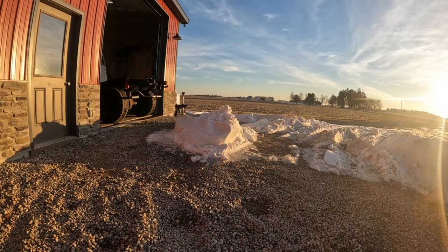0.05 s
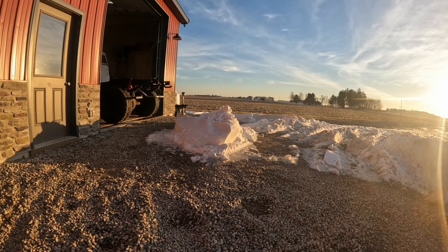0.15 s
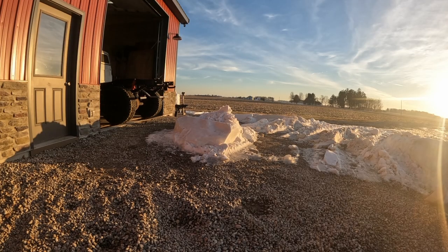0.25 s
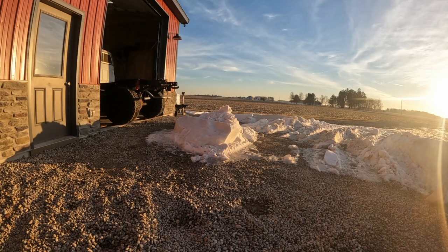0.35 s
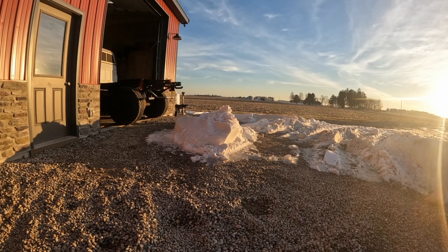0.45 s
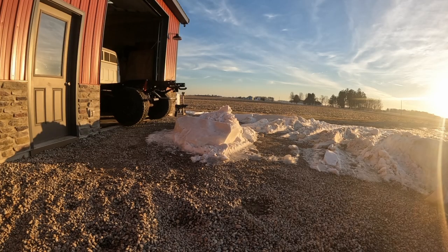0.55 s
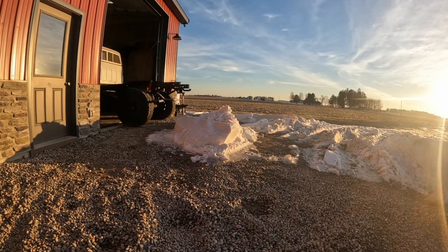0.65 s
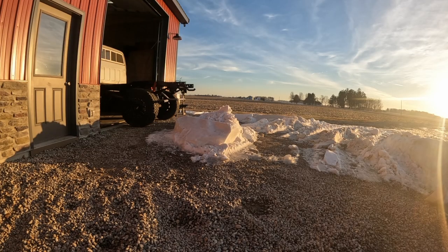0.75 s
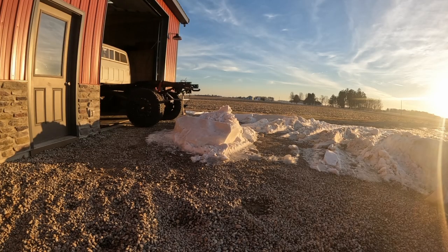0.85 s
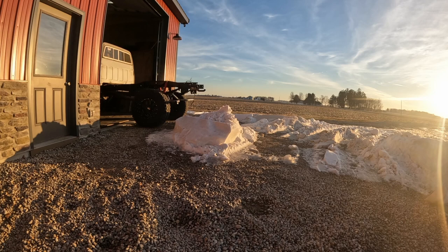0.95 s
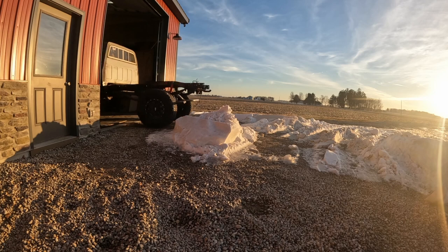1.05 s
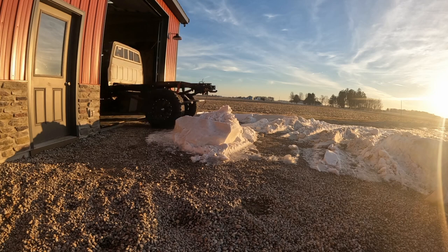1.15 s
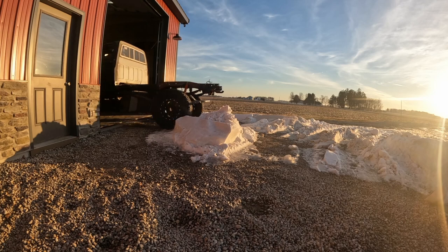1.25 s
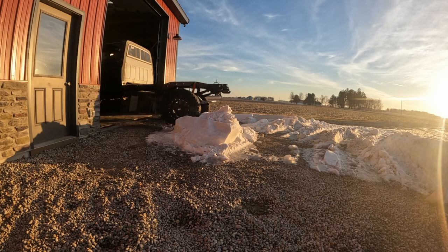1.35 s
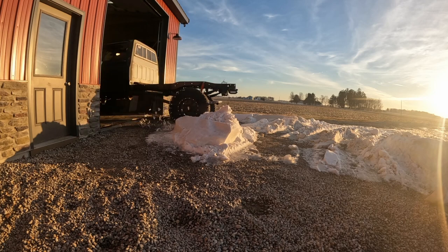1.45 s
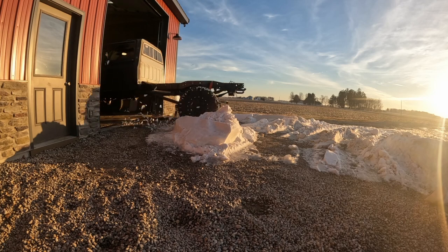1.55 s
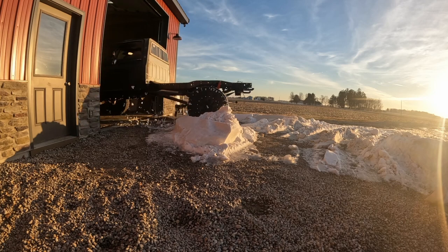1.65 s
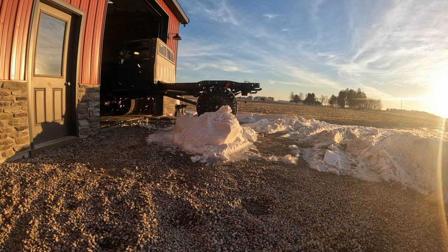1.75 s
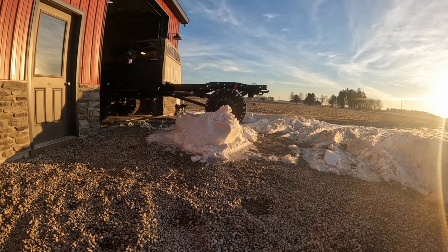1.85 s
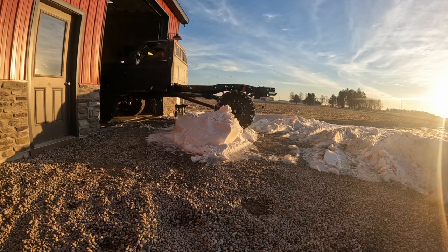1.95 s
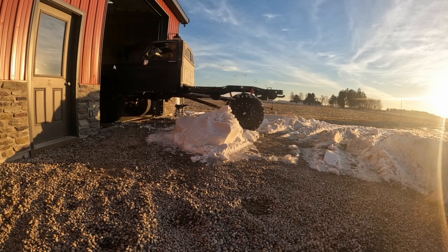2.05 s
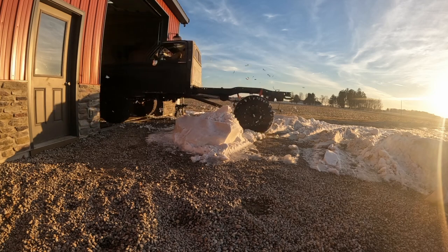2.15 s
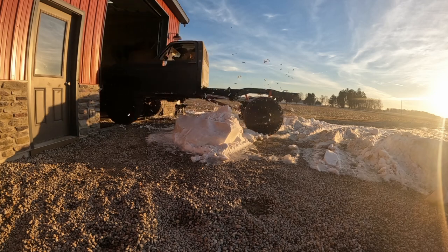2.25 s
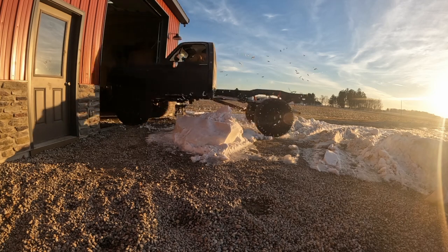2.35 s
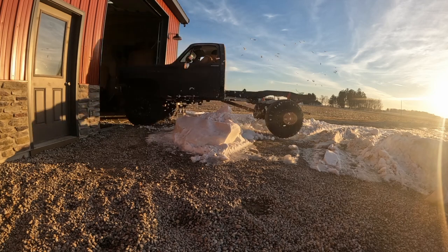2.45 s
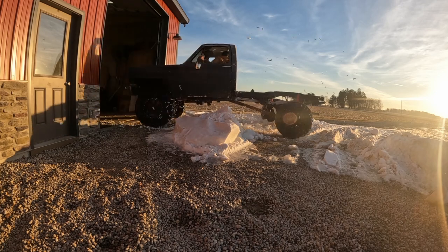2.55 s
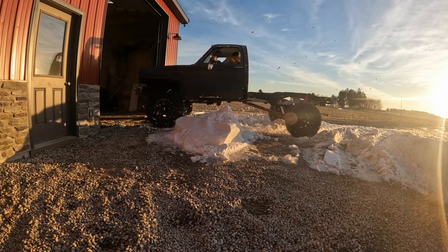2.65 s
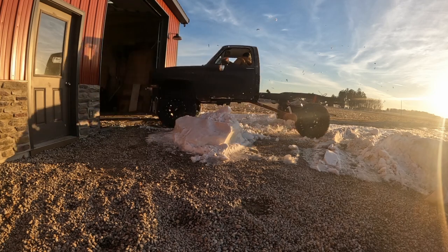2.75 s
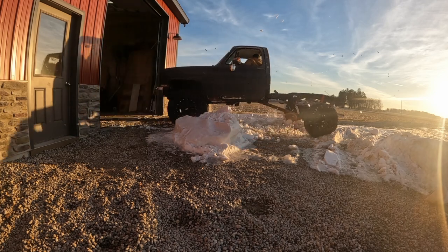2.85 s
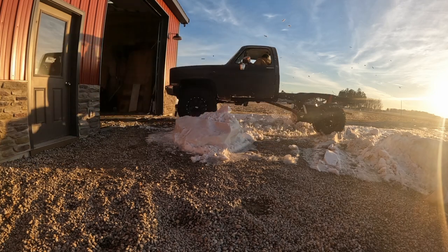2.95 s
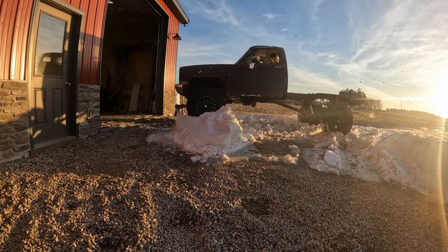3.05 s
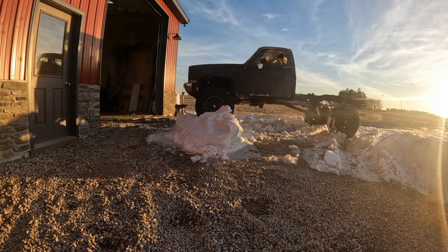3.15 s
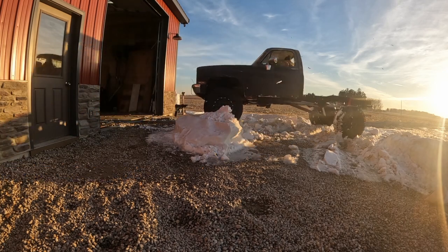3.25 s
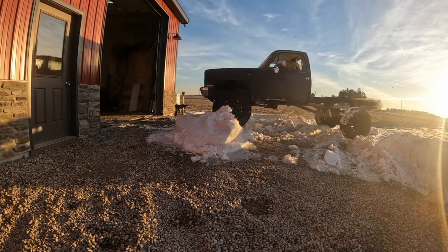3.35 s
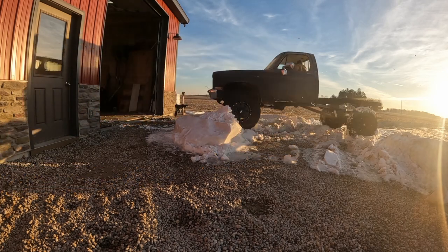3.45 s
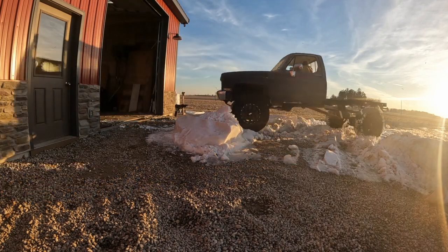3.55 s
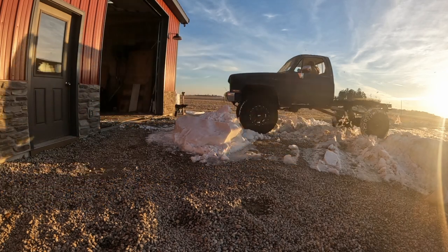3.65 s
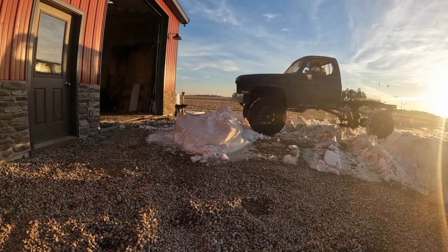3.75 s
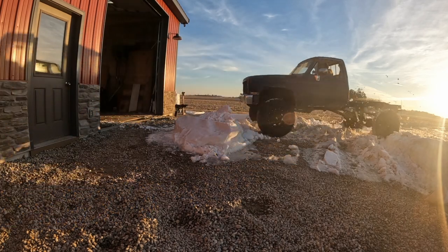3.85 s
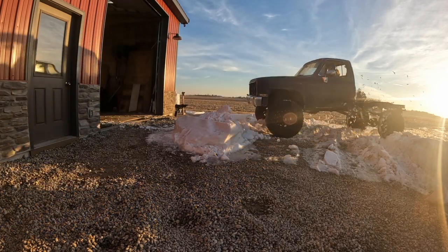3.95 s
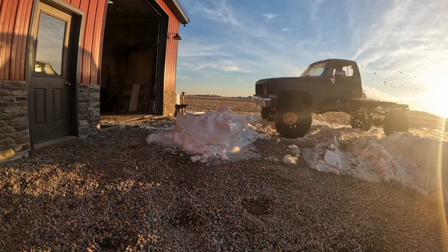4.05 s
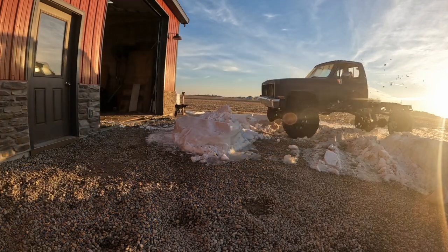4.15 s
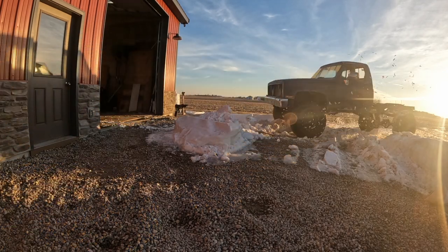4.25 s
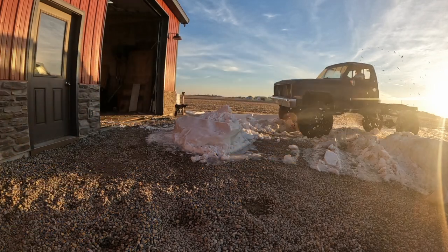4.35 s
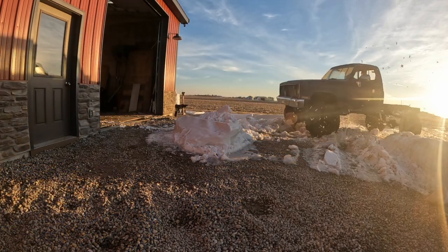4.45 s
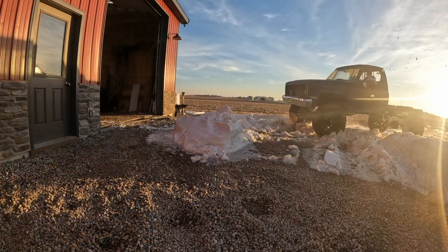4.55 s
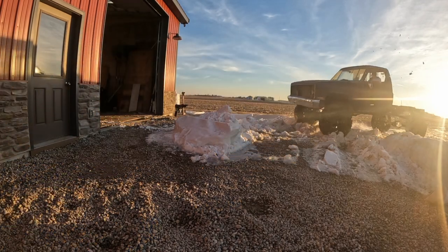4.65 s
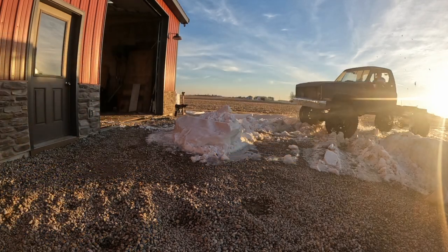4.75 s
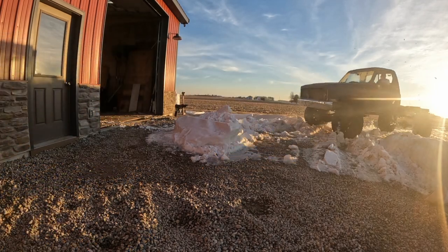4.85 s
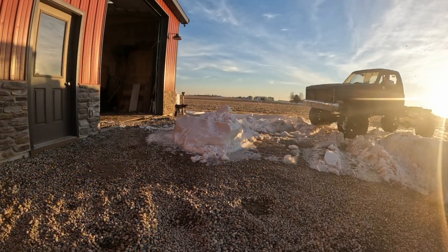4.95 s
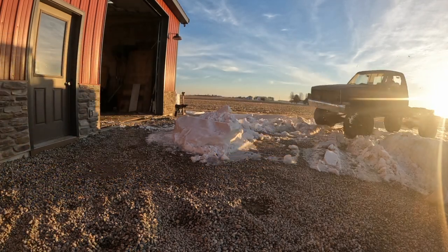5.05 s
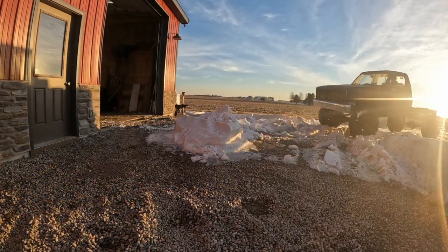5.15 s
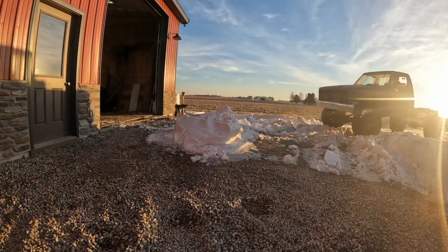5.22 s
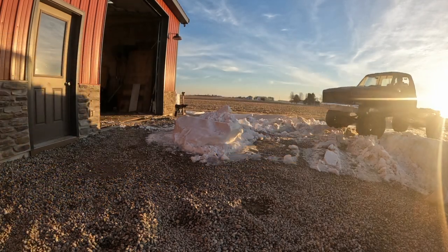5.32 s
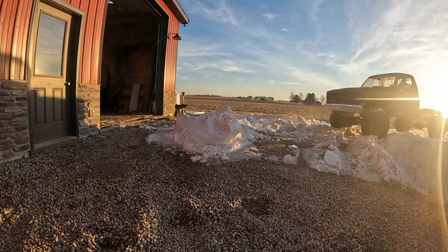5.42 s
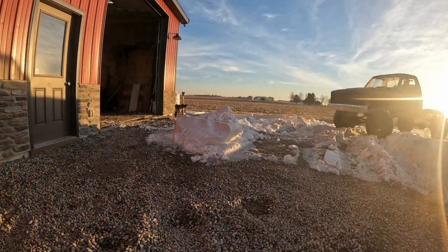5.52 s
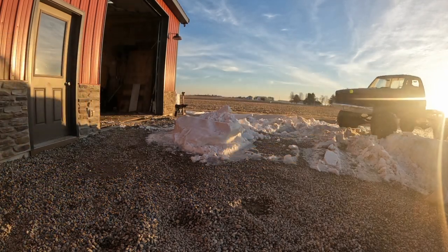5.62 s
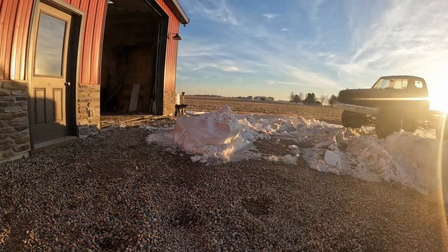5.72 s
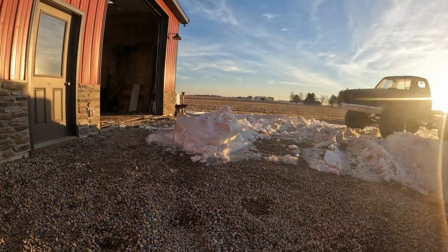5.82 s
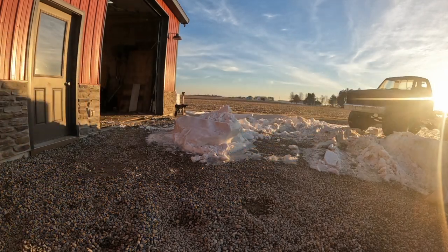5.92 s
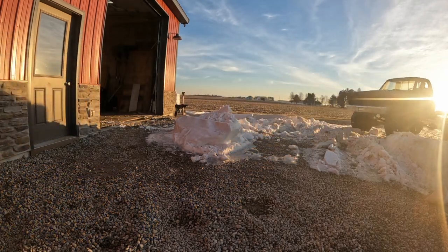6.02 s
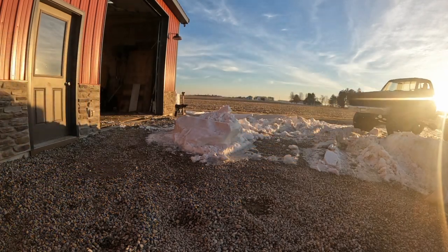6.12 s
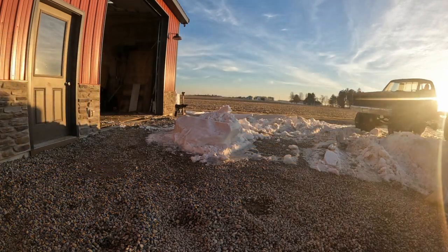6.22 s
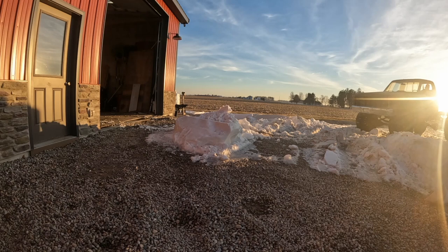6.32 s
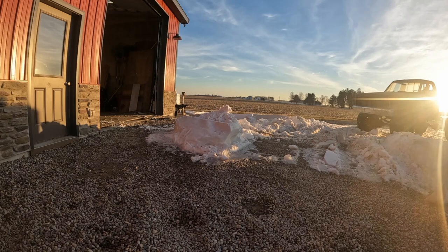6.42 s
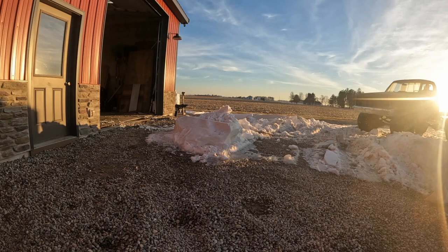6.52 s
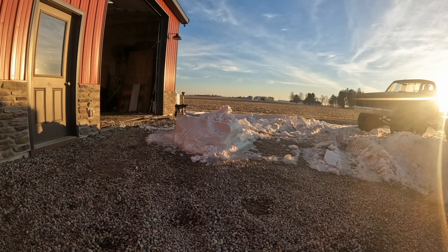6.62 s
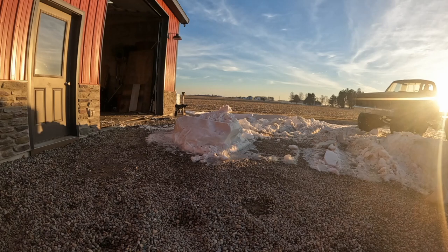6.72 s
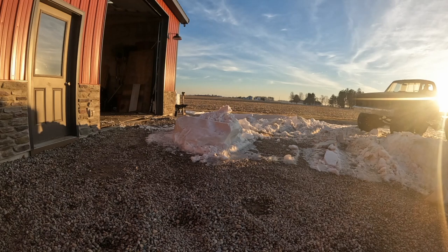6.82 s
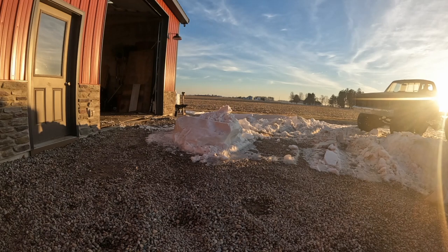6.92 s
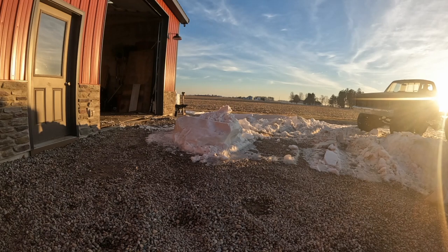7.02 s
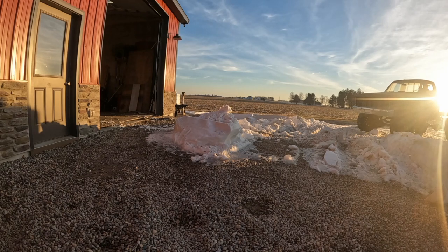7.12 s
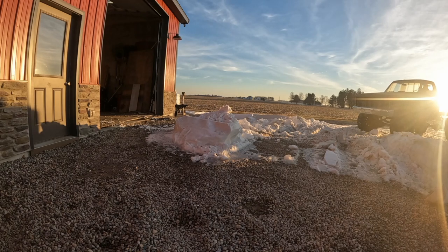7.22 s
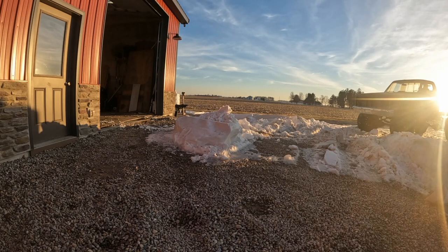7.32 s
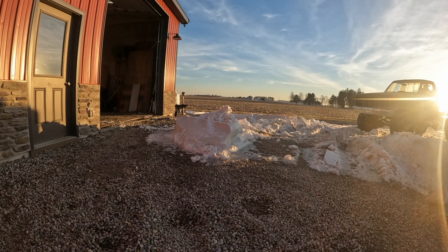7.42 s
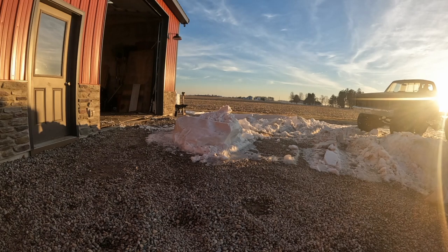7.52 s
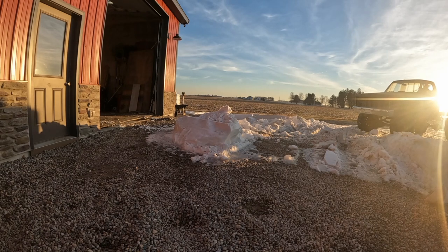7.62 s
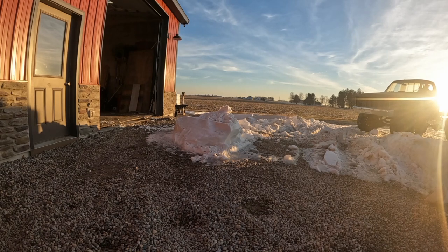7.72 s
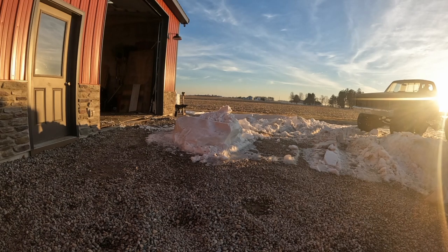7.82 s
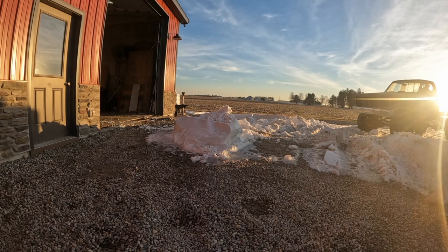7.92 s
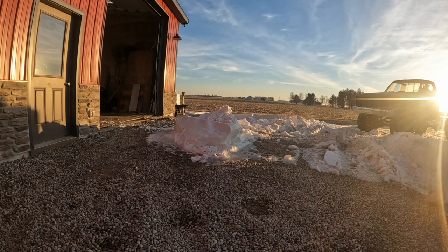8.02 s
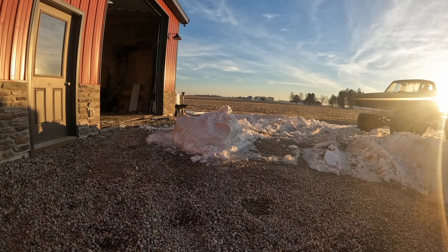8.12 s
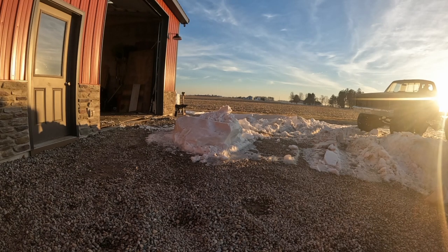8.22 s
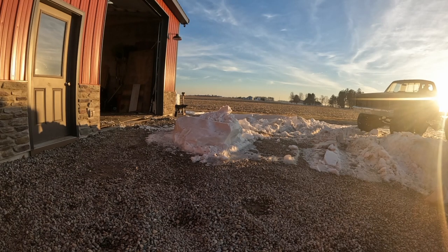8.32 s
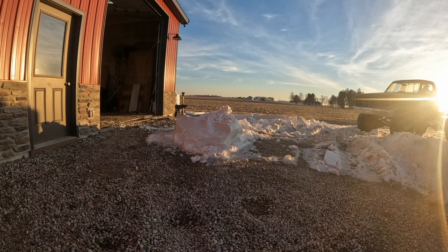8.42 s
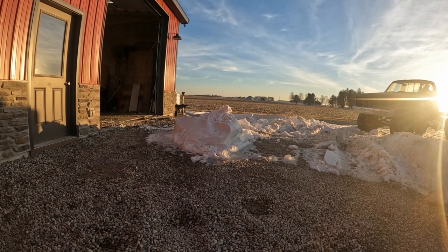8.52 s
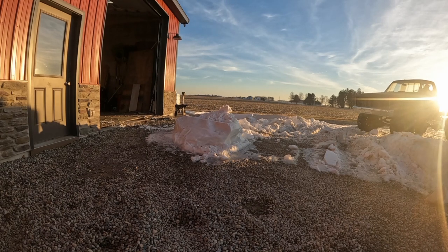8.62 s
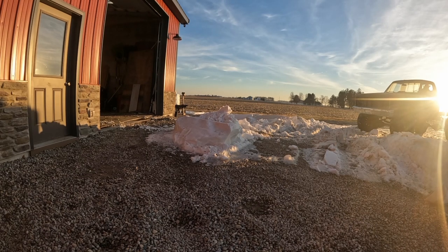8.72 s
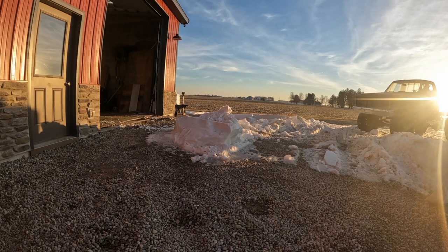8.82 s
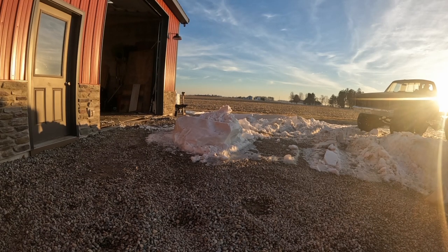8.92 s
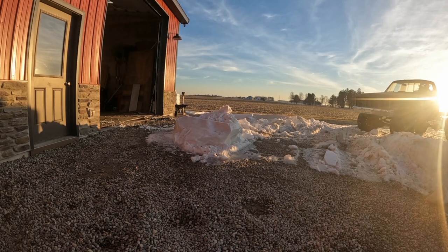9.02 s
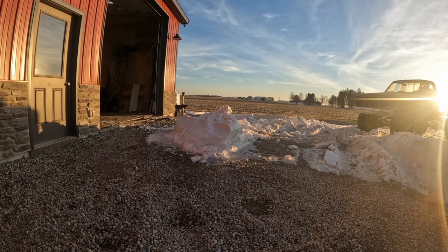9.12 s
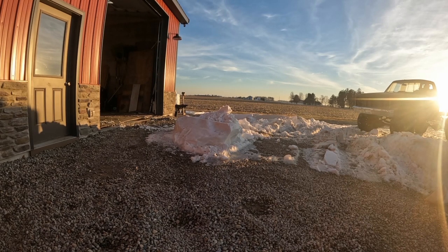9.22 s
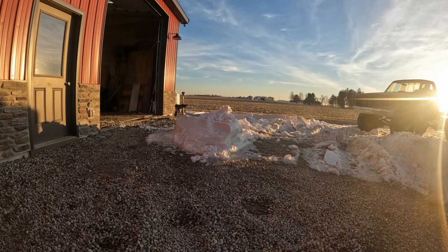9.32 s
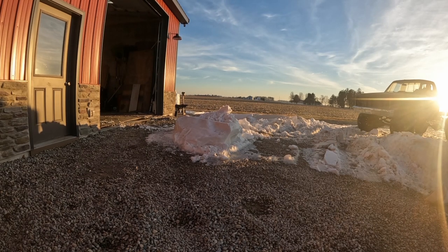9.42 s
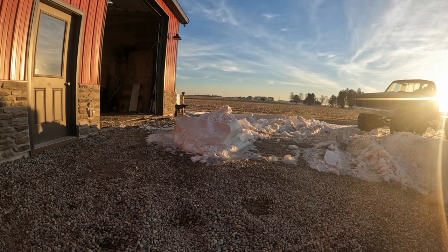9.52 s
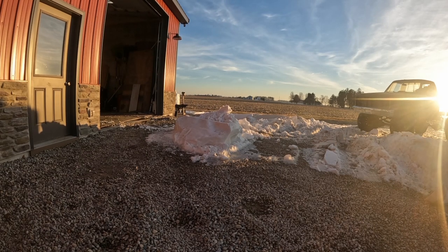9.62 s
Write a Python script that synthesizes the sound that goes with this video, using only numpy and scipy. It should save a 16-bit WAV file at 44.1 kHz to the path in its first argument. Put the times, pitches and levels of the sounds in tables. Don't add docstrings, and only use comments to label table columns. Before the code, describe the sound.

A small fixed stereo camera in an open yard hears a heavy truck with open pipes leave a shed. At 0 s high revs collapse into ragged popping, swelling with a blare through the doorway near 0.8 s. Revs climb from 1 to 1.5 s with dry snaps, dip around 1.8 s, then surge to the hardest roar at 2.6 s, snapping sharply over crunching snow. The throttle shuts at 2.8 s; panels hum and revs collapse near 3 s. A third burst climbs from 3.3 s, sings around 4 s and sags by 5 s. A small stumbling blip comes near 5.6 s, then faint crunches and a tiny brake squeak at 6.3 s. Until about 9.7 s it idles lumpily: one strong crack leads each cycle, some weak or missed, over deep boom, frame drumming and breathy hiss, quickening slightly at the end. Short echoes scatter off wall and snow.

```python
import sys
import numpy as np
from scipy import signal
from scipy.fft import rfft, irfft, next_fast_len
from scipy.io import wavfile
from scipy.ndimage import uniform_filter1d

SR = 44100
rng = np.random.default_rng(int(sys.argv[2]) if len(sys.argv) > 2 else 0)


def generate_wav(sig):
    pcm = np.round(np.clip(np.atleast_2d(sig).T, -1, 1) * 32767).astype(np.int16)
    wavfile.write(sys.argv[1], SR, pcm)


def rack_gain(trim_db):
    fader = np.asarray(trim_db, float)
    return 10 ** (fader / 20)


N = 426444
T = np.arange(N) / SR
HZ = np.fft.rfftfreq(next_fast_len(N), 1 / SR)


def unit(x):
    return x / np.sqrt(np.mean(x ** 2))


def through(x, response):
    size = next_fast_len(N)
    return irfft(rfft(x, size) * response, size)[..., :N]


def read(table):
    hz, value = np.transpose(table)
    return np.interp(np.log(HZ + 1), np.log(hz + 1), value)


def modes(table):
    return sum(gain * 1j * HZ * w / (hz ** 2 - HZ ** 2 + 1j * HZ * w) for hz, w, gain in table)


def moving_mode(x, hz, width_hz):
    turn = np.exp(2j * np.pi * np.cumsum(hz) / SR)
    keep = np.exp(-np.pi * width_hz / SR)
    return np.real(turn * signal.lfilter([1 - keep], [1, -keep], x / turn))


def spikes(times, gains):
    out = np.zeros(N)
    keep = (times >= 0) & (times < T[-1])
    np.add.at(out, (times[keep] * SR).astype(int), gains[keep])
    return out


def fade(x, decay_s, rise_s):
    fall, rise = np.exp(-1 / (np.array([decay_s, rise_s]) * SR))
    falling = signal.lfilter([1], [1, -fall], x)
    return signal.lfilter([1 - rise], [1, -rise], falling)


def walk(rate):
    k = int(SR / rate)
    held = np.repeat(rng.standard_normal(N // k + 1), k)
    return 1.2 * uniform_filter1d(held, size=k)[:N]


def stretch(s, half_s):
    return np.exp(-((T - s) / half_s) ** 4)


def doorway():
    return np.exp(-((T - 0.78) / 0.28) ** 2)


def pulling(rate):
    idle_hz, pull_hz = 5.77, 14.95
    return np.clip((rate - idle_hz) / (pull_hz - idle_hz), 0, 1)


def blend(idle_db, pull_db, pull):
    return idle_db + pull * (pull_db - idle_db)


def truck():
    start, lead_db = cycles()
    rate = np.interp(T, start, 1 / np.gradient(start))
    pull = pulling(rate)
    boom_db, bark_db, rasp_db, hiss_db, drum_db, blare_db = levels(start, lead_db, pull)
    thumps, cracks = firings(start, lead_db, rasp_db)
    thumps = unit(thumps)
    shake = rng.standard_normal(N)
    shaded = (T > 1.29) & (T < 2.33)
    blown = cracks * ~shaded + np.roll(cracks * shaded, int(.009 * SR))
    low_ring, high_rings = mouth_rings(cracks, blown, pull)
    turned = np.interp(T, start, np.arange(len(start)))
    drum_db = np.interp(T - 0.095, T, drum_db)
    out = rack_gain(boom_db) * boom(thumps, shake, rate, pull)
    out += rack_gain(bark_db) * bark(thumps, shake, pull, blare_db)
    out += rack_gain(rasp_db) * (rasp(cracks, pull) + low_ring + punch(cracks, pull))
    out += rack_gain(hiss_db) * (hiss(blown, pull) + high_rings)
    out += rack_gain(drum_db) * drum(start, rate, turned, thumps, shake)
    return out + rocking(turned, pull) + panels() + tyres(rasp_db)


# t/s, engine cycles per s
SPEED = [(0.0, 19.547), (0.158, 9.62), (0.751, 7.699), (0.964, 12.436), (1.427, 15.278), (1.766, 10.631),
         (2.668, 17.028), (3.013, 3.913), (3.097, 7.552), (3.965, 14.942), (4.431, 13.957), (5.042, 4.285),
         (5.666, 10.134), (6.034, 4.92), (6.954, 5.458), (7.617, 4.449), (7.662, 5.652), (9.67, 6.992)]
# t/s of the leading crack, level/dB
UNEVEN = [(0.198, -9.5), (0.3071, 4.5), (0.4377, -0.5), (0.533, 4.5), (1.6201, 0), (1.702, -0.5),
          (2.05, -2.5), (2.6612, 3.5), (2.883, 0), (3.1923, -1.5), (3.3017, 1), (3.5012, -9), (4.167, -4.5),
          (4.5992, -1.5), (4.7053, -4), (4.835, -13.5), (4.9747, -3), (5.1636, -0.5), (5.6818, 1),
          (5.928, -9), (6.315, 2.5), (6.5113, -14.5), (6.7004, 1), (7.072, -1.5), (7.2674, -14.5),
          (7.4743, 3), (7.6831, -3.5), (8.2008, 0), (7.8511, 0.5), (8.685, -1), (1.797, -0.5), (1.887, -1),
          (1.972, 2), (2.131, 0.5), (2.203, 3), (2.272, 2.5), (2.340, 3.5), (2.406, 2), (2.472, 2),
          (2.535, 2.5), (2.597, 2.5), (3.674, 2.5), (3.752, 2), (3.824, 1), (3.895, 1.5), (3.963, 1),
          (4.029, 0), (4.099, 1), (1.129, -0.5), (8.031, 0.5), (8.359, -0.5), (8.522, -0.5), (8.846, -0.5),
          (8.997, 0.5), (9.144, 0.5), (9.293, 0), (9.441, -0.5), (9.588, -2), (4.452, -1.5), (3.593, 2.5),
          (0.973, 1), (1.053, 2), (1.201, -1), (1.271, 0.5), (1.340, 2), (1.407, 1.5), (1.477, 2.5),
         (1.544, -0.5), (3.06, -0.5), (2.724, -7.5), (2.795, -6), (6.119, -2)]


def cycles():
    first_cycle = .7117
    turned = np.cumsum(np.interp(T, *np.transpose(SPEED))) / SR - first_cycle
    start = np.interp(np.arange(int(turned[-1]) + 1), turned, T)
    s, kick_db = np.transpose(UNEVEN)
    nearest = np.argmin(abs(start - s[:, None]), axis=1)
    lead_db = np.zeros(len(start))
    start[nearest] = s
    lead_db[nearest] = kick_db
    return start, lead_db


# t/s, burn level/dB against full, throttle [0-1]
DRIVE = [(0, 1.5, 0), (0.119, -3, 0.53), (0.261, -8, 0.3), (0.312, -3.5, 0.29), (1.098, -0.5, 0.83),
         (1.651, -4.5, 1), (2.552, -5, 1), (2.779, -8.5, 1), (3.161, -9.5, 0.69), (3.291, -2, 0.63),
         (4.501, -3.5, 0.97), (4.781, -7.5, 0.75), (5.267, -5.5, 0.12), (5.4, -0.5, 0.41),
         (5.719, -4.5, 0.95), (5.998, -7, 0.36), (6.4, -3.5, 0.3), (9.67, -3.5, 0.4)]
AWAY_DB_S = (0.089, 0.42, -0.21, 0.32, -0.19, -0.96)
# idling level/dB, pulling level/dB, share of that cycle's kick dB
LEAK = [
    (-4, 1, 0),
    (-0.5, -3.7, 1.3),
    (1.5, -0.5, 0.96),
    (2, 1.5, 0.5),
    (-12, 3, 1.9),
    (9.5, 2, -0.3),
]


def levels(start, lead_db, pull):
    laws = [(-14.5, 1.67, 4, -3.5), (-31.5, 1.84, 14.5, 0.2), (-30.5, 2.03, 12, -0.07),
            (-33.5, 2.05, 0.5, 1.5), (-28.5, 1.17, 9, 3), (-1.5, -0.91, 1, -2.1)]
    leak_share, leak_fade = 0.26, 0.22
    parks_s = 6.5
    s, burn_db, throttle = np.transpose(DRIVE)
    burn_db, throttle = np.interp(T, s, burn_db), np.interp(T, s, throttle)
    turned = np.interp(T, start, np.arange(len(start)))
    blow = uniform_filter1d(np.clip((leak_share - turned % 1) / leak_fade, 0, 1), size=88)
    kicked = uniform_filter1d(blow * lead_db[turned.astype(int)], size=200)
    out = []
    for law, away, (idle_db, pull_db, kick) in zip(laws, AWAY_DB_S, LEAK):
        base_db, share, open_db, fast_db = law
        level = base_db + share * burn_db + open_db * throttle + fast_db * pull
        level = level + away * np.minimum(T, parks_s)
        leak = blend(idle_db, pull_db, pull) * (blow - leak_share)
        out.append(level + leak + kick * kicked)
    out[-1] = out[-1] + 10.5 * doorway()
    return out


# share of the cycle, pulling level/dB, idling level/dB, coasting level/dB
CYLINDERS = [(0, 0, 0, 0), (.125, -20, -3, -14), (.205, -2, -12, -16), (.32, -14, -22, -18),
             (.38, -10, -24, 1), (.47, -22, -25, -14), (.565, -6, -24, -13), (.72, -20, -22, -20),
             (.785, -10, -10, -15), (.92, -20, -24, -13)]
# share of the cycle pulling, level/dB, share idling, level/dB
THUMPS = [(-0.027, -1.5, -0.025, 0.0), (0.121, -6.1, 0.091, -5.9), (0.226, -5.0, 0.218, -5.2),
          (0.282, -4.5, 0.295, -10.2), (0.338, -4.4, 0.336, -3.8), (0.398, -5.2, 0.534, -7.8),
          (0.553, -14.0, 0.596, -4.8), (0.773, -1.6, 0.731, -3.0), (0.818, 0.0, 0.779, -6.6),
          (0.918, -4.6, 0.871, -1.8)]
# t/s, peak level/dB
POPS = [(0.3429, -8.5), (0.4635, -10.5), (0.5505, -17), (0.623, -12.5), (0.693, -2.5), (0.7604, -16.5),
        (0.8236, -9.5), (0.9195, -6), (4.249, -11), (4.395, -10.5), (8.707, -29.5), (1.737, -15),
        (1.829, -18), (1.919, -15.5), (0.645, -11.5), (0.814, -10), (0.518, -21.5), (2.355, -15.5),
        (1.991, -5.5), (3.515, -8), (5.441, -13.5), (6.5412, -22), (7.295, -26), (0.078, -2.5),
        (2.07, -6.5), (3.2657, -9.5), (3.422, -2.5), (3.436, -16), (5.552, -9.5), (5.647, -9), (5.912, -28),
        (4.917, -26), (5.096, -25), (5.293, -21.5)]


def firings(start, lead_db, rasp_db):
    jitter, thump_scatter_db, crack_scatter_db = .002, 1.2, 2.0
    pop_s, pop_db = np.transpose(POPS)
    crack_over_rasp_db = 25.5
    pop = rack_gain(6.5 + pop_db - np.interp(pop_s, T, rasp_db + crack_over_rasp_db))
    pop *= np.sqrt(np.interp(pop_s, start, np.gradient(start)))

    start = np.r_[2 * start[0] - start[1], start][:, None]
    length = np.diff(start, append=2 * start[-1:] - start[-2:-1], axis=0)
    pull = pulling(1 / length)
    share, crack_pull, crack_idle, crack_coast = np.transpose(CYLINDERS)
    share_pull, thump_pull, share_idle, thump_idle = np.transpose(THUMPS)
    chance = rng.standard_normal((3, len(start), len(share)))
    follows = share > 0

    thump_s = start + length * (blend(share_idle, share_pull, pull) + jitter * chance[0])
    thump_db = blend(thump_idle, thump_pull, pull) + thump_scatter_db * chance[1]
    crack_s = start + length * (share + jitter * chance[0] * follows)
    coasting = (start > 1.6) & (start < 1.95)
    crack_db = np.where(coasting, crack_coast, blend(crack_idle, crack_pull, pull))
    crack_db = crack_db + crack_scatter_db * chance[2] * follows
    crack_db[1:, 0] += lead_db
    crack_db[1:, 1] += lead_db
    thump_db[1:, :3] += 0.17 * lead_db[:, None]
    even = np.sqrt(length)
    cracks = spikes(crack_s, rack_gain(crack_db) * even) + spikes(pop_s, pop)
    return spikes(thump_s, rack_gain(thump_db) * even), cracks


# idling f/Hz, multiple of the cycle rate pulling, width/Hz, gain
BOOM = [(59.1, 5.1, 11.7, 0.67), (84, 6.2, 41.5, -0.25), (99.5, 7.6, 13.1, 0.4), (19.5, 1.1, 11, -0.035)]


def boom(thumps, shake, rate, pull):
    push = thumps + rack_gain(-26 + 6 * pull) * shake
    out = 0
    for hz, multiple, width, gain in BOOM:
        out = out + gain * moving_mode(push, np.maximum(hz, multiple * rate), width)
    return unit(through(out, modes([(57.4, 146, 1)]) / (1 + 1j * HZ / 260) ** 2))


# f/Hz, width/Hz, signed gain
BARK = [(140.5, 21.2, -0.2), (216, 20.5, 0.21)]
# f/Hz, width/Hz, signed gain
BLARE = [(261, 76, -0.053), (350, 173, 0.031), (631, 96, -0.024)]


def bark(thumps, shake, pull, blare_db):
    push = thumps + rack_gain(-13) * shake
    short = unit(through(push, modes(BARK) * modes([(160.0, 113, 1)]) ** 2))
    blare = unit(through(push, modes(BLARE) * modes([(337, 1400, 1)])))
    return short + rack_gain(-13.0 + 7.9 * pull + blare_db) * blare


def punch(cracks, pull):
    late = np.exp(-2j * np.pi * HZ * 0.00276)
    loaded = np.maximum(pull, 0.89 * doorway())
    return loaded * rack_gain(1.5) * unit(through(cracks, late * modes([(140, 206, 1)]) ** 2))


def gas(cracks, colour, eddies_hz, decay_s, tail_s, tail_db, steady_db, top_db=0, scatter_db=2.0,
        rise_s=.0013):
    out = 0
    for low_hz, high_hz in zip(eddies_hz, eddies_hz[1:]):
        hits = cracks * rack_gain(scatter_db * rng.standard_normal(N))
        spit = unit(fade(hits, decay_s, rise_s))
        breath = unit(fade(hits, tail_s, rise_s=.005)) * rack_gain(3 * walk(160))
        flow = spit + rack_gain(tail_db) * breath + rack_gain(steady_db + 3 * (low_hz > 7000))
        inside = (HZ >= low_hz) & (HZ < high_hz)
        band = through(unit(flow) * rng.standard_normal(N), rack_gain(read(colour)) * inside)
        out = out + band * rack_gain(top_db * (low_hz > 5000))
    return unit(out)


# f/Hz, level/dB per Hz
RASP = [(420, -29.5), (720, -8), (837, -12), (915, -1.5), (1080, 2.5), (1260, -9), (1650, -10), (1980, -10),
        (2500, -30.5), (3250, -49.5), (5500, -120)]


def rasp(cracks, pull):
    return gas(cracks, RASP, (0, 800, 1500, SR), decay_s=.0026, tail_s=.022, tail_db=-5,
               steady_db=-2.5 - 7 * pull)


# f/Hz, level/dB per Hz
HISS = [(1400, -18), (2400, -17.5), (2630, -9), (2870, 0.5), (3080, 2), (3840, -4), (4600, -4), (5100, -5),
        (5600, -10.5), (7100, -10), (8300, -24), (10000, -30.5), (12000, -43.5), (15000, -57)]


def hiss(blown, pull):
    eddies_hz = (0, 3600, 4400, 5600, 7600, 10000, SR)
    return gas(blown, HISS, eddies_hz, decay_s=.0035, tail_s=.026, tail_db=-1.5, steady_db=-4 - 4 * pull,
               top_db=-2.5 + 4 * pull, scatter_db=3.5, rise_s=.0022)


def mouth(cracks, hz, width_hz):
    centre = hz * (1 + .045 * walk(25))
    hits = cracks * rack_gain(2.2 * rng.standard_normal(N))
    return unit(moving_mode(moving_mode(hits, centre, width_hz), centre, width_hz))


# f/Hz, width/Hz, idling level/dB, pulling level/dB
MOUTH = [(1113, 300, -9.5, -2.5), (3088, 450, -11, -3), (4436, 290, -10, -11.5), (2400, 310, -37, -10.5)]


def mouth_rings(cracks, blown, pull):
    rings = []
    for hz, width, idle_db, pull_db in MOUTH:
        source = blown if hz > 2800 else cracks
        rings.append(rack_gain(blend(idle_db, pull_db, pull)) * mouth(source, hz, width))
    return rings[0], sum(rings[1:])


def drum(start, rate, turned, thumps, shake):
    knock = .6 * unit(spikes(start + 0.0038, 1 / np.sqrt(np.interp(start, T, rate))))
    knock += 0.045 * np.cos(16 * np.pi * turned) + .05 * np.cos(32 * np.pi * turned)
    return unit(through(knock + .4 * thumps + shake, modes([(109.4, 27, 1)]) ** 2))


# times a cycle, idling level/dB, pulling level/dB
SHUDDER = [(1, -52, -38), (3, -35, -31.5)]
# multiple of the cycle rate, t/s, half length/s, peak level/dB
SINGING = [(8, 1.34, 0.27, -32), (8, 2.1, 0.21, -17.5), (14, 2.7, 0.27, -27), (13, 2.55, .12, -23),
           (8, 3.97, 0.18, -25), (13, 4.4, 0.35, -26), (16, 9.34, 0.64, -22), (16, 7.2, .35, -27.5),
           (9, 6.4, .3, -25), (5, 4.7, .15, -23), (8, 9.5, 0.34, -24.5)]


def rocking(turned, pull):
    out = np.zeros(N)
    for count, idle_db, pull_db in SHUDDER:
        level_db = blend(idle_db, pull_db, pull) + 2.8 * walk(5.7)
        out += rack_gain(level_db) * np.sin(2 * np.pi * count * turned)
    smooth = uniform_filter1d(turned, size=4000)
    for count, s, half_s, db in SINGING:
        out += rack_gain(db) * stretch(s, half_s) * np.sin(2 * np.pi * round(count) * smooth)
    return out


# f/Hz, t/s, half length/s, peak level/dB
PANELS = [
    (110, 2.802, 0.089, -17.5),
    (108.8, 3.09, 0.067, -22.5),
    (168.3, 3.52, 0.15, -23),
    (160, 5.05, 0.074, -26),
]


def panels():
    out = np.zeros(N)
    for hz, s, half_s, db in PANELS:
        out += rack_gain(db + 1.4 * walk(20)) * stretch(s, half_s) * np.sin(2 * np.pi * hz * T)
    return out


# t/s, peak level/dB
SNAPS = [(1.052, -38), (1.128, -36), (1.169, -36), (1.212, -37), (1.241, -39), (2.340, -40), (2.406, -36),
         (2.4723, -29), (2.5356, -28), (2.5975, -26), (2.6614, -32), (3.4007, -37), (3.4444, -50)]


def snaps():
    s, peak_db = np.transpose(SNAPS)
    burst = fade(spikes(s + 0.002, rack_gain(peak_db + 1)), decay_s=.00006, rise_s=.00002)
    ring = modes([(1080, 460, 23.0), (3300, 1400, -24.5), (8000, 8100, 12.5)])
    return through(burst, ring / (1 + (HZ / 12500) ** 12))


def ground(hz, width_hz):
    return unit(through(rng.standard_normal(N), modes([(hz, width_hz, 1)]) ** 2 / (1 + (HZ / 2500) ** 2)))


# t/s, half length/s, level/dB
CRUNCHES = [
    (2.17, 0.27, -34.5),
    (4.6, 0.21, -39.5),
    (2.93, 0.073, -41.5),
    (2.85, 0.014, -27),
    (6.181, 0.023, -36.5),
    (6.641, .016, -38),
    (6.07, 0.043, -44.5),
    (6.531, 0.021, -43),
]


def tyres(rasp_db):
    roll_db = np.interp(T, (4.6, 4.9), [-44, -54])
    roll_db = roll_db + rasp_db - rasp_db.mean()
    swell = sum(rack_gain(db) * stretch(s, half_s) for s, half_s, db in CRUNCHES)
    roll = rack_gain(roll_db + 1.5 * walk(12)) * ground(407, 403)
    return roll + swell * rack_gain(2.1 * walk(240)) * ground(650, 900)


def squeak():
    swell = np.exp(-((T - 6.29) / .017) ** 2)
    return rack_gain(-42) * swell * unit(through(rng.standard_normal(N), modes([(3650, 60, 1)]) ** 2))


def yard(x):
    t60_s, wet_db, from_hz = 0.12, -6, 2200
    t = T[:SR // 2]
    tail = rng.standard_normal((2, 2, len(t))) * np.exp(-np.log(1000) * t / t60_s)
    tail /= np.sqrt((tail ** 2).sum(2))[..., None]
    treble = (1j * HZ / (from_hz + 1j * HZ)) ** 2 * (1 + (HZ / 12500) ** 2)
    one, other = through(x, rfft(tail, next_fast_len(N)) * treble)
    turn = np.cumsum(walk(2)) * 6 / SR
    return rack_gain(wet_db) * (np.cos(turn) * one + np.sin(turn) * other)


def breeze():
    return rack_gain(-56) * unit(through(rng.standard_normal(N), modes([(45, 120, 1)])))


# f/Hz, level/dB
PORT_DB = [(60, 0.0), (180, 0.0), (310, 0.5), (530, 3), (910, 4), (1570, 3), (2710, 10.5), (4670, -1),
           (8050, 1), (12000, 4.5)]
# f/Hz, phase lead [radians]
PORT_LEAD = [(0, 0), (400, 0), (1640, .5), (2150, -.3), (2580, -1.6), (3530, .2), (4390, 0), (5430, .7),
             (6370, .1), (8180, -.1)]


def scene():
    dry, clicks = truck() + squeak(), snaps()
    sides = np.array([[1], [-1]]) / 2
    ports = rack_gain(sides * read(PORT_DB)) * np.exp(1j * sides * read(PORT_LEAD))
    heard = dry + clicks + yard(dry + .35 * clicks)
    return through(heard, ports) + 2 * sides * breeze()


def roll_off(x):
    return signal.sosfilt(signal.butter(12, 14800, fs=SR, output="sos"), x)


def record(dry):
    mix = np.tanh(.95 * dry) / .95
    return roll_off(mix)


dry = scene()
out = record(dry)
generate_wav(out)
```